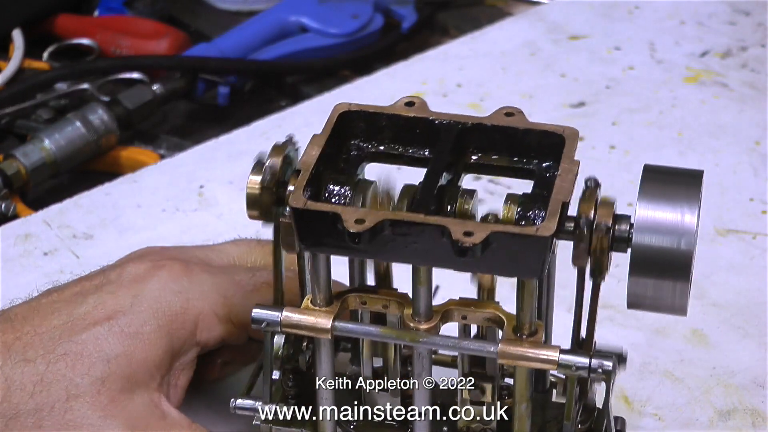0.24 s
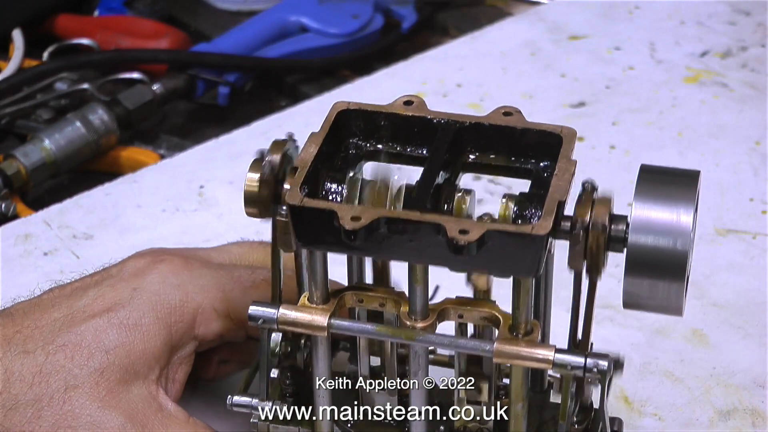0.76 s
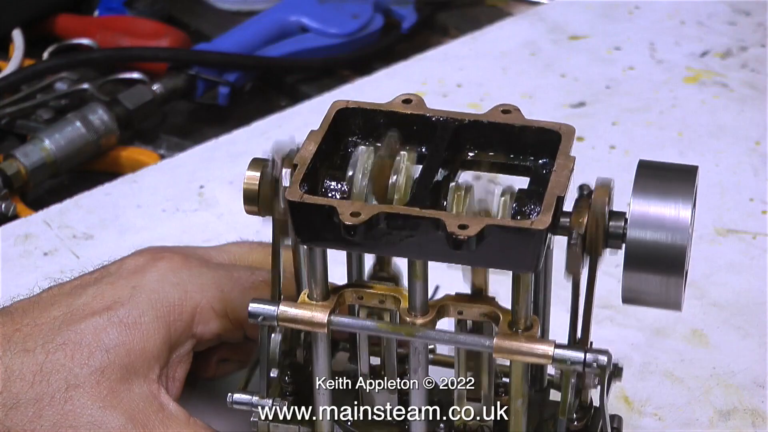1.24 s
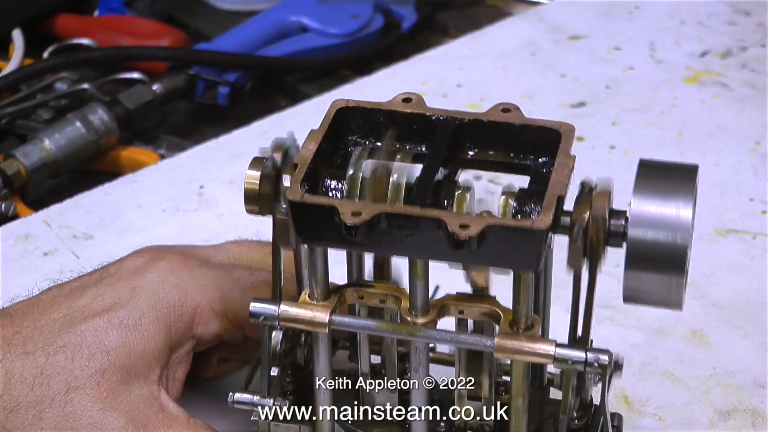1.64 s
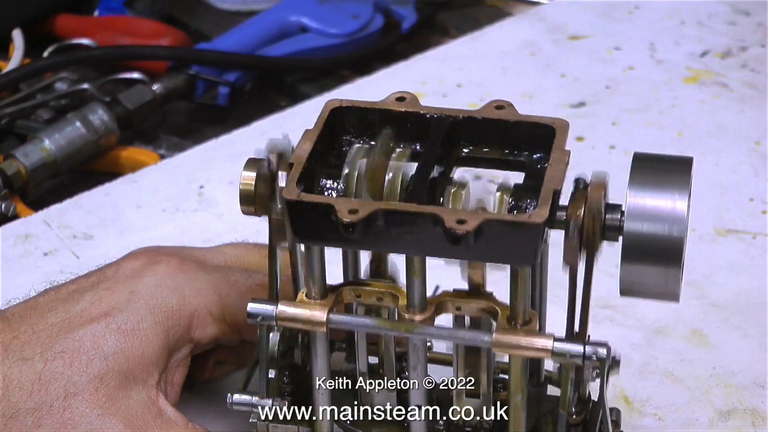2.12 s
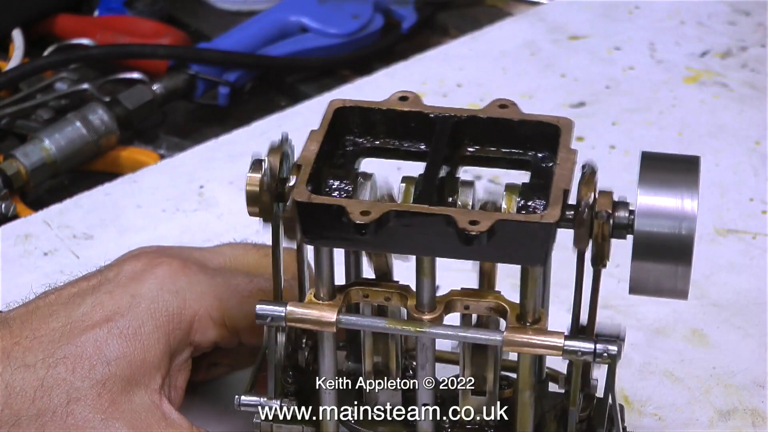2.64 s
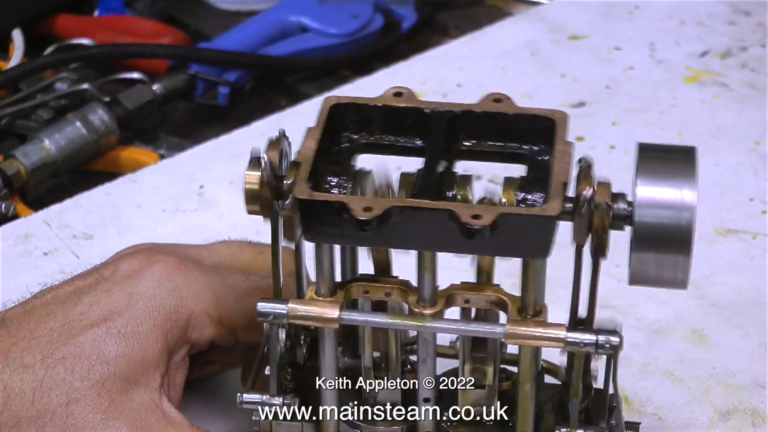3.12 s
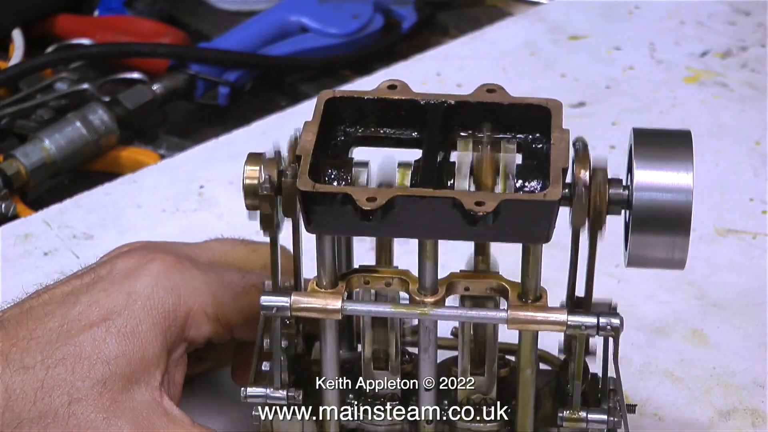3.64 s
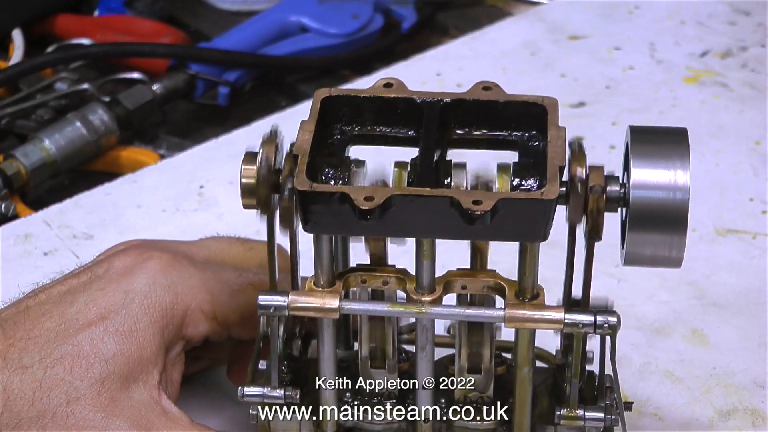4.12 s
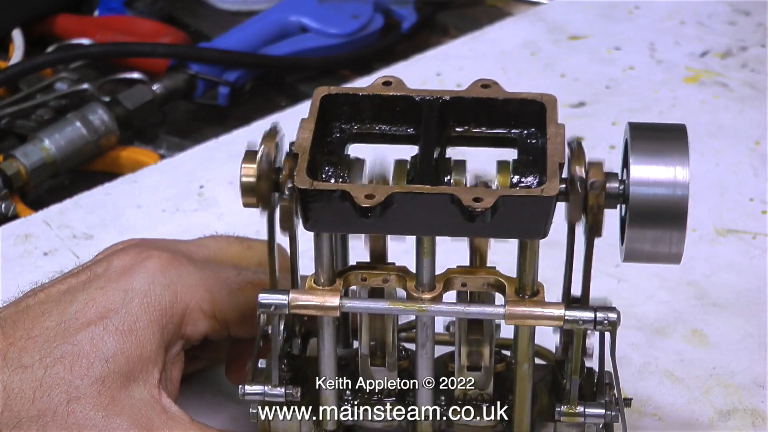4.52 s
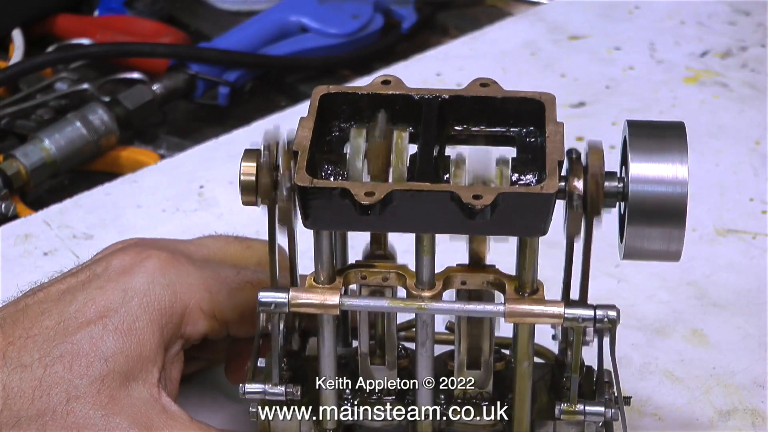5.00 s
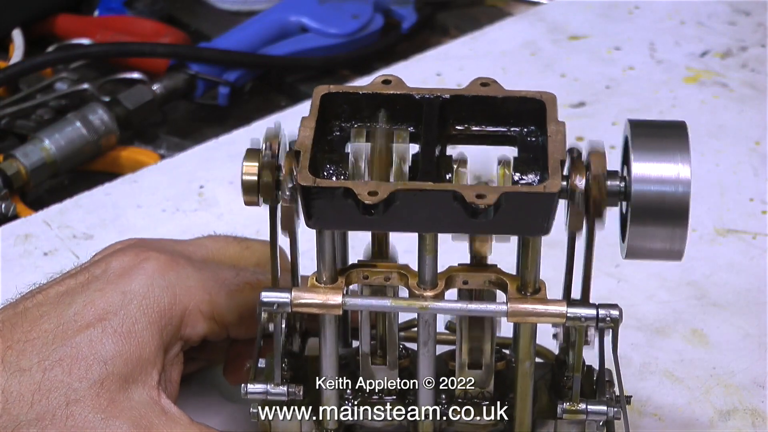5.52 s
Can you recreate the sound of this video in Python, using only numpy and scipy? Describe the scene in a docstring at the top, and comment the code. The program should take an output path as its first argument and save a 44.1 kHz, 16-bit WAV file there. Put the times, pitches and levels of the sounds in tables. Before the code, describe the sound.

Close, dry and thin sound of a tiny engine already running: sharp high air spits about forty times a second, merging into a buzzing flutter over steady hiss. Small hollow chuffs repeat each turn, while loose metal ticks and dull bench knocks sit beneath. Early jolts are firmest; near the middle a faint high whistle and a hollow airy tone swell, then the run continues steadily to the end.

```python
"""Air hisses from a leak and spits in quick beats: a small twin-cylinder model steam engine on compressed air.
It turns about eight times a second, picks up to just over ten, then eases a little. Each turn brings four
exhaust beats (noise shaped by the ports) and two hollow chuffs (short noise puffs that rise in pitch).
Rods and valve links rumble, tick and knock the workbench (filtered noise and ringing modes).
Thin whistles and a hollow tone under the hand come and go; a small workshop adds a short echo."""
import sys
import numpy as np
from scipy import signal
from scipy.fft import rfft, irfft, next_fast_len
from scipy.io import wavfile

SR = 44100
rng = np.random.default_rng(int(sys.argv[2]) if len(sys.argv) > 2 else 0)


def file_out(sig):
    """Save sig as 16-bit WAV at sys.argv[1]."""
    # one column per channel
    cols = np.atleast_2d(sig).T
    # limit, then scale
    lim = np.clip(cols, -1, 1)
    pcm = np.round(lim * 32767).astype(np.int16)
    wavfile.write(sys.argv[1], SR, pcm)


N = 254143
TIME = np.arange(N) / SR  # s
SIZE = next_fast_len(N, real=True)
FREQ = np.fft.rfftfreq(SIZE, 1 / SR)  # Hz


def gain_of(db):
    """Turns decibels into a factor for the amplitude."""
    return 10 ** (np.asarray(db) / 20)


def evened(x):
    """Scales a signal to an rms (average strength) of 1."""
    return x / np.sqrt(np.mean(x ** 2) + 1e-20)


def read(points, hz):
    """Reads a table of f/Hz and value between its points, on a logarithmic pitch axis."""
    f, value = np.transpose(points)
    return np.interp(np.log(hz + 1), np.log(f + 1), value)


def at_time(curve, s):
    """Reads a table of t/s and value at the time s."""
    return np.interp(s, *np.transpose(curve))


def follow(curve):
    """Reads a table of t/s and value at every sample."""
    return at_time(curve, TIME)


def add(mix, s, sound):
    """Lays a short sound into the mix, starting at time s."""
    part = mix[max(round(s * SR), 0):][:len(sound)]
    part += sound[:len(part)]


def filtered(x, gain):
    """Multiplies each frequency of a sound by its own gain."""
    return irfft(rfft(x, SIZE) * gain, SIZE)[:N]


def colour(x, db):
    """Shapes noise by a dB spectrum; white noise keeps its power, so only the differences in dB count."""
    return filtered(x, evened(gain_of(db)))


def bump(hz, width_hz, db):
    """A resonance, drawn as a hump (or a dip) on a dB spectrum."""
    return db / (1 + (2 * (FREQ - hz) / width_hz) ** 2)


def low_pass(x, edge_hz):
    """Smooths away everything that changes faster than the edge frequency."""
    return signal.sosfilt(signal.butter(2, edge_hz, fs=SR, output="sos"), x)


def resonate(x, hz, width_hz):
    """A resonance that follows the curve hz: shift down to zero, smooth, shift back."""
    turn = np.exp(2j * np.pi * np.cumsum(hz * np.ones(N)) / SR)
    return (turn * low_pass(x / turn, width_hz / 2)).real


def flutter(rate_hz):
    """A random curve of rms 1 that wanders within bounds at the given rate."""
    knots = rng.uniform(-0.97, 1, N // 8)
    return evened(np.interp(2 * rate_hz * TIME, np.arange(len(knots)), knots))


# how fast the crank turns; it picks up, then eases a little: (t/s, speed/turns per s)
CRANK_SPEED = [(0.0, 8.085), (0.2, 8.556), (0.5, 9.294), (0.65, 9.951), (0.85, 9.774), (1.05, 10.103),
               (1.4, 10.166), (2.2, 10.411), (2.6, 10.127), (3.0, 10.308), (3.45, 10.239), (3.65, 10.045),
               (4.3, 9.888), (5.0, 9.741), (5.76, 9.697)]


def crank():
    """The crank angle in turns, added up from its speed."""
    return np.cumsum(follow(CRANK_SPEED)) / SR


def passes(angle, at):
    """The times at which the crank passes a given angle, once a turn."""
    return np.interp(np.arange(at % 1, angle[-1]), angle, TIME)


def blast(angle, opens, rise, decay):
    """Flow through a port: it opens quickly and the cylinder empties exponentially."""
    age = (angle - opens) % 1
    flow = (1 - np.exp(-(age / rise) ** 2)) * np.exp(-age / decay)
    return flow / flow.max()


def oily_air(spit_db, spit_hz):
    """Turbulent noise chopped into small spits by oil in the port."""
    return evened(rng.standard_normal(N) * gain_of(spit_db * flutter(spit_hz)))


def whistle(x, hz, width_hz, lift_db):
    """The edge of a port lifts one band of the air that passes it."""
    band = signal.lfilter(*signal.iirpeak(hz, hz / width_hz, fs=SR), x)
    return x + (gain_of(lift_db) - 1) * band


# the four exhaust beats of every turn:
# (port opens/turns, rise/turns, decay/turns, jet flow/dB, passage flow/dB, whistle f/Hz, whistle lift/dB)
EXHAUST_BEATS = [(0.009, 0.045, 0.14, -19.8, -37.5, 9070, 3.5), (0.284, 0.038, 0.125, -24, -40, 8000, 8.5),
                 (0.516, 0.04, 0.135, -19, -38, 14100, 3.5), (0.745, 0.0334, 0.2, -23.5, -39.5, 12700, 3.5)]
# air pressure behind the beats, as a change of their jet flow: (t/s, change/dB)
AIR_PRESSURE = [(0, 0.7), (.8, -0.5), (1.2, 0.9), (1.8, 0.2), (2.35, 1), (2.5, -1.6), (3, -0.5), (3.35, 0),
                (4.3, -0.2), (4.7, .5), (5.76, .2)]
BEAT_SCATTER_DB = 0.65  # no two beats are quite alike


def exhaust(angle):
    """Four beats a turn, each a bright jet and a duller rush in the passages, over a steady leak."""
    leak = gain_of(-33.0) * oily_air(spit_db=3.0, spit_hz=609)
    air = leak
    port_flow, passage_flow = np.zeros((2, N))
    for opens, rise, decay, jet_db, pipe_db, whistle_hz, lift_db in EXHAUST_BEATS:
        turn_number = np.floor(angle - opens).astype(int)
        chance = rng.standard_normal(int(angle[-1]) + 2)[turn_number]
        beat_db = jet_db + follow(AIR_PRESSURE) + BEAT_SCATTER_DB * chance
        flow = blast(angle, opens, rise, decay) * gain_of(beat_db)
        spits = flow * oily_air(spit_db=1.0, spit_hz=621.0)
        air += gain_of(-0.7) * whistle(spits, whistle_hz, width_hz=810, lift_db=lift_db)
        port_flow += flow
        # the passages fill a little after the port opens
        passage_flow += gain_of(pipe_db) * blast(angle, opens, 2.4 * rise, 0.7 * decay)
    tones = edge_tone(port_flow) + thin_whistles(port_flow)
    return jet(air) + passage_rush(passage_flow) + tones + hand_hollow(passage_flow)


# colour of the jets, early and late, as the hand turns the engine: (f/Hz, relative level/dB per Hz)
EARLY_JET_COLOUR = [(2000, -70), (4300, -29.5), (6000, -21), (7200, -16.5), (8100, -11.5), (8700, -11),
                    (9400, -1), (10500, 4.5), (11100, -0.5), (11900, 0), (12600, -10.5), (13300, -8),
                    (14000, -14), (15800, -10.5)]
LATE_JET_COLOUR = [(2000, -74), (4300, -47), (6000, -21.5), (7200, -15.5), (8100, -10.5), (8700, -12),
                   (9400, 2.5), (10200, 5.5), (11100, 0.5), (11900, -0.5), (12600, -2), (13300, -8.5),
                   (14000, -11), (15800, -11.5)]
# how far the jets have moved to the late colour: (t/s, share 0-1)
JET_FACING = [(0, 0.16), (1.8, 0), (2.3, 0.7), (3.2, 0.98), (5.76, 0.9)]


def jet(air):
    """The sharp hiss of air leaving the ports, blended from two colours as the ports turn."""
    late = np.clip(follow(JET_FACING), 0, 1)
    early_hiss = colour(air, read(EARLY_JET_COLOUR, FREQ))
    late_hiss = colour(air, read(LATE_JET_COLOUR, FREQ))
    return (1 - late) * early_hiss + late * late_hiss


# colour of the air rushing in the passages: (f/Hz, relative level/dB per Hz)
PASSAGE_COLOUR = [(500, -29.5), (930, -23.5), (1200, -16), (1440, -14.5), (1570, -4.5), (1800, -9),
                  (2080, -3), (2550, -1.5), (3400, -5.5), (3900, -10.5), (4500, -6.5), (6000, -4.5),
                  (9000, 5), (16000, -33)]
# rise and fall of that rush (used about its mean) and of the valve ticks: (t/s, level/dB)
RUSH_LEVEL = [(0, -43.5), (0.4, -45), (0.8, -44), (1, -43.5), (1.25, -41.5), (1.55, -42.5), (1.9, -43),
              (2.3, -41), (2.55, -44), (2.9, -42), (3.3, -42), (3.8, -43.5), (4.3, -43.5), (4.8, -44),
              (5.3, -44.5), (5.76, -45.5)]


def passage_rush(passage_flow):
    """Pulsing air, with a weak steady stream, makes a duller noise inside the passages."""
    stream = passage_flow + gain_of(-48)
    rush = colour(stream * oily_air(spit_db=1.5, spit_hz=220.7), read(PASSAGE_COLOUR, FREQ))
    rush_db = follow(RUSH_LEVEL)
    return gain_of(rush_db - rush_db.mean()) * rush


def edge_tone(flow):
    """The jet sings roughly on the lip of the port, its pitch darting about."""
    hz = 10250 * (1 + 0.044 * flutter(rate_hz=86))
    return gain_of(-34.0) * evened(resonate(flow * rng.standard_normal(N), hz, width_hz=550))


# the hollow between hand and engine, blown by the exhaust: (t/s, f/Hz, level/dB)
HAND_HOLLOW = [(0, 2870, -69), (.6, 2670, -76), (1.25, 2700, -58), (2.1, 2670, -65), (2.239, 2140, -54),
               (2.36, 2010, -42), (2.5, 1850, -51), (2.65, 1720, -46), (2.9, 1920, -59), (3.2, 1980, -49),
               (3.6, 2070, -51), (4, 2045, -51.5), (4.9, 2110, -53), (5.76, 2075, -62)]
HOLLOW_STEEPNESS = 2.2  # power of the flow: the hollow sounds mostly at the height of each beat


def hand_hollow(flow):
    """Pulsing air sounds the gap under the hand; its pitch is lowest near 2.65 s, then rises partway again."""
    s, hz, db = np.transpose(HAND_HOLLOW)
    blown = evened(flow) ** HOLLOW_STEEPNESS * rng.standard_normal(N)
    ring = resonate(blown, np.interp(TIME, s, hz), width_hz=280)
    return gain_of(np.interp(TIME, s, db)) * evened(ring)


# colour of the sliding rumble of rods and crossheads: (f/Hz, relative level/dB per Hz)
RUMBLE_COLOUR = [(20, -44), (100, -45), (132, -31), (150, -37), (200, -39), (255, -9), (300, -3.5),
                 (362, -3), (420, -4), (500, -6), (580, -5), (780, -10.5), (930, -22.5), (1500, -35)]
# strength of that rumble before the swing of the load: (t/s, level/dB)
SLIDING_LEVEL = [(0, -56), (.35, -58), (1.2, -60), (1.8, -61.5), (2.1, -60.5), (2.6, -62.5), (3.3, -60.5),
                 (4.4, -59.5), (4.9, -58), (5.76, -59)]
# the bed's main mode hums until the hand shifts and damps it; before the load swing: (t/s, level/dB)
BED_HUM_LEVEL = [(0, -73), (.3, -69), (1, -61), (2, -61.5), (2.3, -54.5), (2.6, -65), (3.4, -66),
                 (5.76, -89)]
# the slides are loaded most late in the turn
LOAD_SWING_DB, LOAD_PEAK_TURNS = 1.9, 0.84


def sliding_parts(angle):
    """Sliding parts rumble and keep the bed humming, both swelling with the load once a turn."""
    load = gain_of(LOAD_SWING_DB * np.cos(2 * np.pi * (angle - LOAD_PEAK_TURNS)))
    rumble = gain_of(follow(SLIDING_LEVEL)) * colour(rng.standard_normal(N), read(RUMBLE_COLOUR, FREQ))
    hum = evened(resonate(rng.standard_normal(N), hz=357.2, width_hz=26))
    return load * (rumble + gain_of(follow(BED_HUM_LEVEL)) * hum)


# ringing modes of the thin steel links of the valve gear: (f/Hz, relative level/dB, time to fall 60 dB t/s)
LINK_MODES = [(1434, -7.5, 0.026), (1850, -4, 0.037), (2300, -3, 0.041), (2680, -1, 0.022),
              (2865, 0.5, 0.054), (3190, -9, 0.05), (3670, -4, 0.058), (4120, -3, 0.045), (5130, 6, .02)]


def valve_gear(angle):
    """Loose pins tick at random as each valve is thrown; every tick rings its own mix of the links' modes."""
    throw = sum(blast(angle, *beat[:3]) for beat in EXHAUST_BEATS)
    t, out = np.arange(SR // 14) / SR, np.zeros(N)
    hz, db, t60 = np.transpose(LINK_MODES)[:, :, None]
    tick_times = TIME[rng.random(N) < 70 * throw / SR]  # 70 ticks per s on average where throw is 1
    for s in tick_times:
        mode_scatter_db = 4 * rng.uniform(-0.84, 1.03, db.shape)
        tick_scatter_db = 3 * rng.uniform(-0.86, 0.76)
        size_db = db + mode_scatter_db + tick_scatter_db
        phase_turns = rng.random(hz.shape)
        modes = gain_of(size_db - 60 * t / t60) * np.sin(2 * np.pi * (hz * t + phase_turns))
        add(out, s, modes.sum(0))
    return gain_of(follow(RUSH_LEVEL) - 6.5) * out


# ringing modes of the engine bed on the bench: (f/Hz, relative level/dB, time to fall 60 dB t/s)
BED_MODES = [(270, -11.5, 0.075), (327, -4.5, 0.038), (368.3, 6.5, 0.047), (405, 0, 0.023), (468, 3, 0.04),
             (551, -10, 0.067), (572, 4, 0.045), (667, -4, 0.05), (790, -10, 0.04)]


def knock(level_db, hard_db):
    """One blow rings the bed; a harder one lifts its upper modes."""
    t = np.arange(SR // 6) / SR
    hz, db, t60 = np.transpose(BED_MODES)[:, :, None]
    upper = hz > 440
    onset = 1 - np.exp(-(t / np.where(upper, .013, .004)) ** 2)  # the thump comes first, the rattle follows
    size_chance, phase_chance = rng.standard_normal((2, len(BED_MODES), 1))
    size_db = db + hard_db * upper + 2.6 * size_chance
    wave = np.sin(2 * np.pi * hz * (t - .005) + 1.01 * phase_chance)
    ring = (onset * gain_of(size_db - 60 * t / t60) * wave).sum(0)
    return gain_of(level_db) * ring / abs(ring).max()


# where in every turn the rods reverse and take up their slack, before seating and scatter:
# (crank angle/turns, peak level/dB, lift of the upper modes/dB)
ROD_KNOCKS = [(.115, -50, -2), (.468, -43, 2.5), (.63, -50, 4), (.783, -48, -4.5)]
# how the bed sits on the bench under the hand, added to every rod knock:
# (t/s, level change/dB, lift of the upper modes/dB, delay/turns)
BED_SEATING = [(0, -8, -2, 0.015), (.3, -1, 6, .006), (.52, -3, -5, 0.007), (.7, 4.5, 1.5, .006),
               (1, 2.5, -4, 0.0065), (1.15, 0, -6, 0.0053), (2.3, -4, -18, 0.0051), (2.6, -5.5, -1, 0.0143),
               (3.15, -3, 3, 0.0072), (3.7, -3.5, 1, -0.016), (4.3, -1, 4, -0.0213), (4.8, 2, 7, -.02),
               (5.45, 0, 1, -0.014), (5.76, -4, -18, -0.025)]
KNOCK_SCATTER_DB, KNOCK_SCATTER_TURNS = 2, 0.0068


def rod_knocks(angle):
    """Slack in the bearings knocks the bed near the same angles each turn, as firmly as the bed is seated."""
    out = np.zeros(N)
    when, *seating = np.transpose(BED_SEATING)
    for at, db, hard_db in ROD_KNOCKS:
        for s in passes(angle, at):
            seat_db, seat_hard_db, delay = (np.interp(s, when, column) for column in seating)
            size, slip = rng.standard_normal(2)
            delay_s = (delay + KNOCK_SCATTER_TURNS * slip) / at_time(CRANK_SPEED, s)
            level_db = db + seat_db + KNOCK_SCATTER_DB * size
            add(out, s + delay_s, knock(level_db, hard_db + seat_hard_db))
    return out


def hollow_puff(hz, glide, width_hz, length_s):
    """A short puff through a cavity whose pitch rises as the piston shortens it; 60 ms, loudest mid-way."""
    t = np.arange(-.03, .03, 1 / SR)
    drive = rng.standard_normal(len(t)) + 1j * rng.standard_normal(len(t))
    ring = low_pass(drive, width_hz / 2)
    pitch = hz * (1 + glide * np.tanh(t / length_s))
    tone = (ring * np.exp(2j * np.pi * np.cumsum(pitch) / SR)).real
    puff = tone * np.exp(-(t / length_s) ** 2)
    return puff / np.sqrt(np.sum(puff ** 2) / (2 * length_s * SR))


# the hollow chuffs of every turn, before their level changes and scatter:
# (crank angle/turns, level/dB, centre f/Hz, pitch glide/share of f, width f/Hz, length t/s)
HOLLOW_CHUFFS = [(.153, -44, 1728, 0.149, 432, 0.0075), (.85, -54, 1448, 0.0386, 240, 0.004)]
# how strongly the passage chuffs: (t/s, level change/dB)
CHUFF_STRENGTH = [(0, -2), (.5, -1.5), (1.55, 1.5), (2.1, -0.5), (2.36, 1.5), (2.75, -1.5), (3.2, 2),
                  (3.6, 0.5), (4.9, 1.5), (5.76, 0.5)]
CHUFF_SCATTER_DB, CHUFF_PITCH_SCATTER = 0.2, 0.0546  # pitch scatter is a share of the pitch


def chuffs(angle):
    """The open passage gives a strong hollow chuff on the first beat and a lighter one on the fourth."""
    out = np.zeros(N)
    for at, db, hz, glide, width_hz, length_s in HOLLOW_CHUFFS:
        for s in passes(angle, at):
            level_db = db + at_time(CHUFF_STRENGTH, s) + CHUFF_SCATTER_DB * rng.standard_normal()
            puff_hz = hz * (1 + CHUFF_PITCH_SCATTER * rng.standard_normal())
            puff = hollow_puff(puff_hz, glide, width_hz, length_s)
            start = s - len(puff) / SR / 2
            cut = max(round(-start * SR), 0)  # drops what would lie before time zero
            add(out, start, gain_of(level_db) * puff[cut:])
    return out


# the loudest knocks, at set times on top of the rod knocks: (t/s, peak level/dB, lift of the upper modes/dB)
LOUD_KNOCKS = [(.289, -38, -1), (.314, -39, 11), (.402, -40, 4), (0.425, -40, 5), (.617, -39, -1),
               (0.93, -37, 3), (2.908, -42, -13), (3.565, -40, 3), (3.757, -41.5, 3), (4.673, -46, 6),
               (4.775, -40, -7), (5.179, -46, 4)]


def loud_knocks():
    """Further, louder knocks at set times, ringing the same bed modes as the rod knocks."""
    out = np.zeros(N)
    for s, db, hard_db in LOUD_KNOCKS:
        add(out, s, knock(db, hard_db))
    return out


# thin whistles that swell in the jets; level is that of the tone before its swell:
# (t/s at its height, half length t/s, f/Hz, level/dB)
THIN_WHISTLES = [(.6, .18, 15000, -42), (2.3, .16, 13500, -37)]


def thin_whistles(flow):
    """High, airy tones that pulse with the beats, swell and fade."""
    out = np.zeros(N)
    for s, length_s, hz, db in THIN_WHISTLES:
        tone = evened(resonate(flow * rng.standard_normal(N), hz, width_hz=420))
        swell = np.exp(-((TIME - s) / length_s) ** 2)
        out += gain_of(db) * swell * tone
    return out


def near_echoes(x):
    """Bench and hand reflect the hiss over paths that drift, so that its colour wanders."""
    out = x.copy()
    for delay_s, db in [(.0007, -48), (.0019, -22.5), (.0043, -15)]:
        path_s = delay_s + .00003 * flutter(rate_hz=0.79)
        out += gain_of(db) * np.interp(TIME - path_s, TIME, x)
    return out


# narrow resonances of the casting and passages; a minus is a dip: (f/Hz, width f/Hz, lift/dB)
CASTING_MODES = [(910, 59, -7.5), (1458, 130, 6.5), (1598, 138, -13), (2124, 94, 0), (2888, 98, 4.5),
                 (3380, 74, 8.5), (3620, 29, 10.5), (3880, 52, 9), (4930, 120, 3), (6050, 24, 6.5),
                 (9980, 110, -5)]


def casting(air):
    """Metal and passages lift or weaken narrow bands of the air sound."""
    return filtered(air, gain_of(sum(bump(*mode) for mode in CASTING_MODES)))


# how long the workshop rings: (f/Hz, time to fall 60 dB t/s)
ROOM_DECAY = [(250, 0.13), (2000, 0.18), (10000, 0.06), (16000, 0.77)]


def workshop(x):
    """Sparse reflections of random sign, each band dying at its own speed."""
    size = SR // 3
    sign = rng.choice([-1., 1.], size)
    hits = rng.random(size) < 3000 / SR  # about 3000 reflections per s
    taps = sign * hits * (np.arange(size) > .003 * SR)  # none in the first 3 ms
    hz, t, z = signal.stft(taps, SR, nperseg=256)
    fade = gain_of(-60 * t / read(ROOM_DECAY, hz)[:, None])
    tail = signal.istft(z * fade, SR, nperseg=256)[1]
    return signal.fftconvolve(x, tail / np.linalg.norm(tail))[:N]


def scene():
    """Air and mechanism, all but the loudest knocks and slow changes timed by the crank, in the room."""
    angle = crank()
    air = casting(near_echoes(exhaust(angle)) + chuffs(angle))
    running_gear = sliding_parts(angle) + rod_knocks(angle) + loud_knocks()
    engine = air + running_gear + valve_gear(angle)
    return (engine + gain_of(-10.5) * workshop(engine))[None]


EDGE_HZ = 15850  # upper band limit


def record(dry):
    """Cuts the bass, adds a trace of low noise and limits the treble."""
    thin = signal.sosfilt(signal.butter(6, 215, "high", fs=SR, output="sos"), dry)
    # noise colour: (f/Hz, relative level/dB per Hz)
    noise_db = read([(20, -12), (90, -12), (132, -2.5), (200, 1.5), (400, -24), (2000, -60)], FREQ)
    thin = thin + gain_of(-86) * colour(rng.standard_normal(N), noise_db)
    band_limit = signal.firwin(1023, EDGE_HZ, window=("kaiser", 9), fs=SR)
    return signal.oaconvolve(thin, band_limit[None], "same")


dry = scene()
out = record(dry)
file_out(out)
```